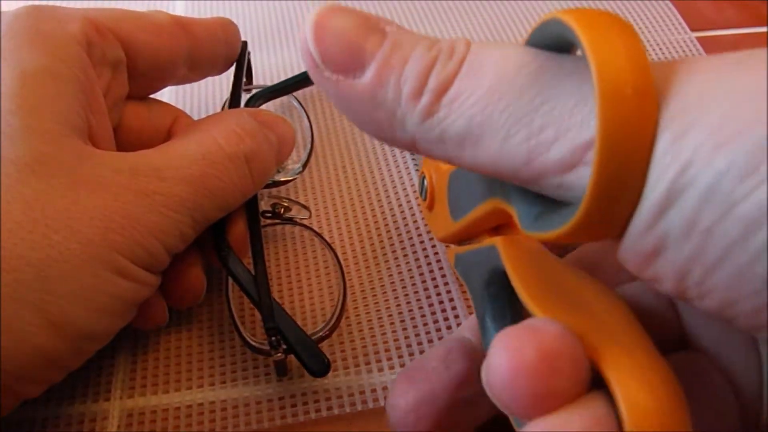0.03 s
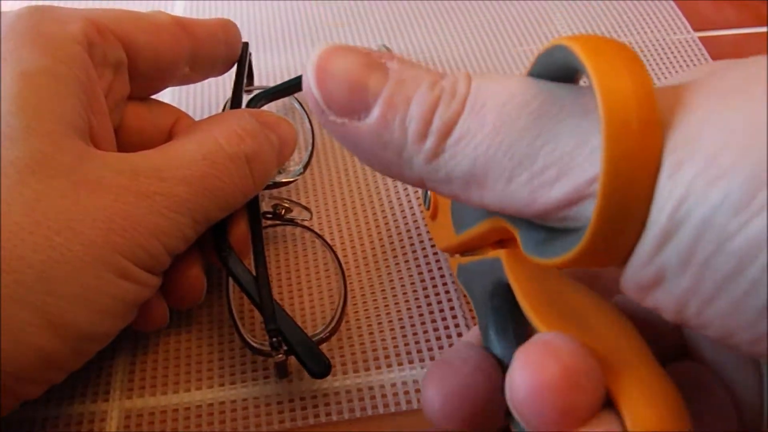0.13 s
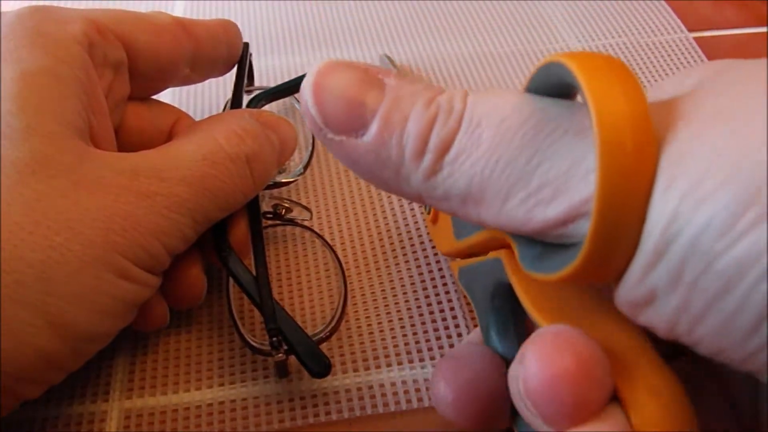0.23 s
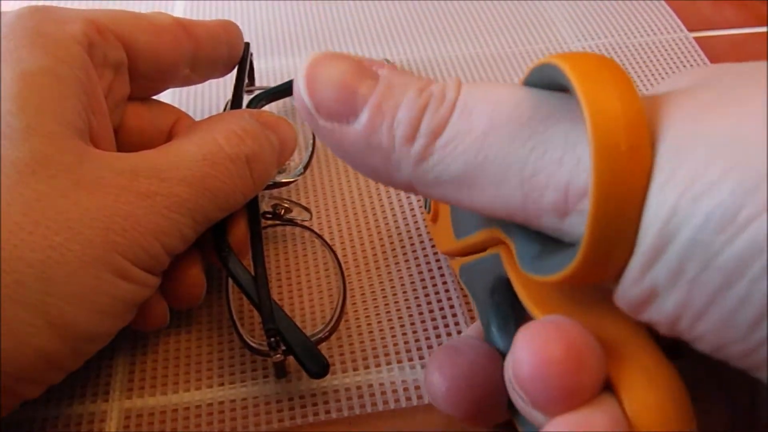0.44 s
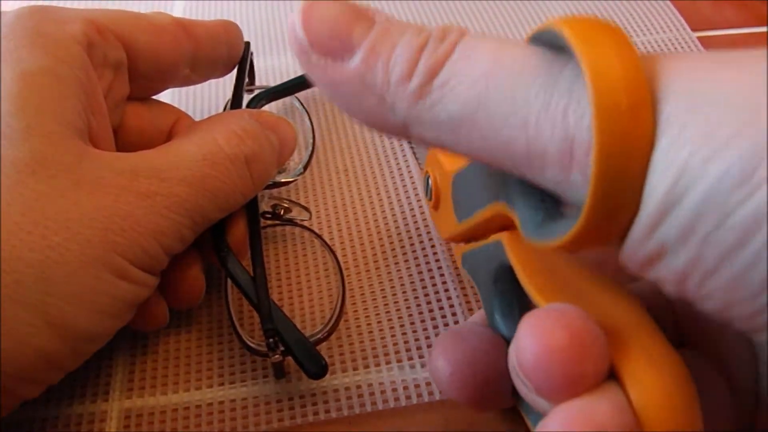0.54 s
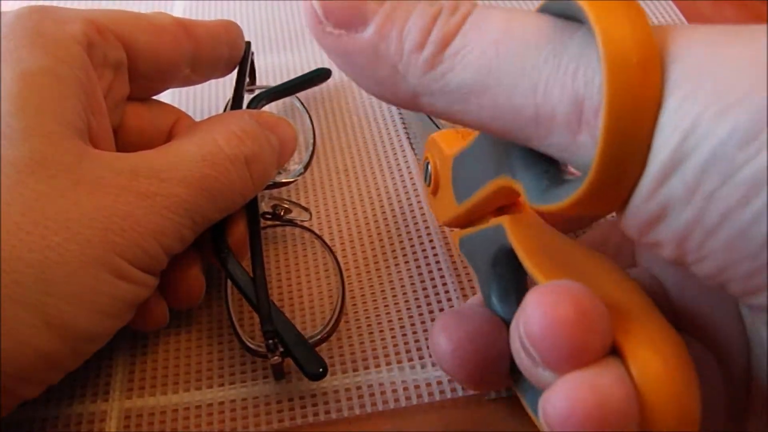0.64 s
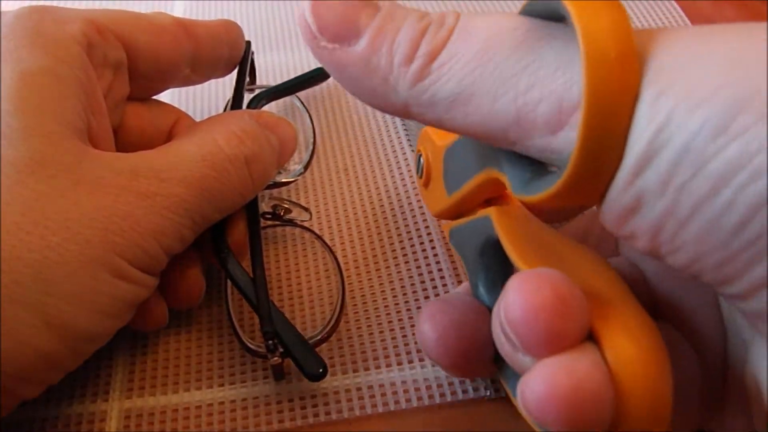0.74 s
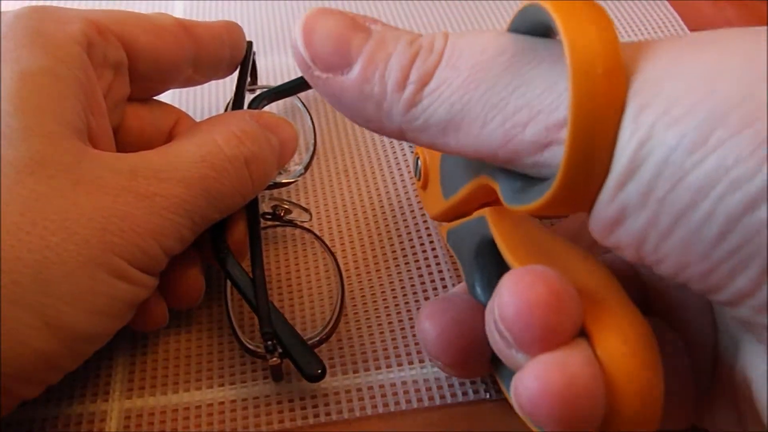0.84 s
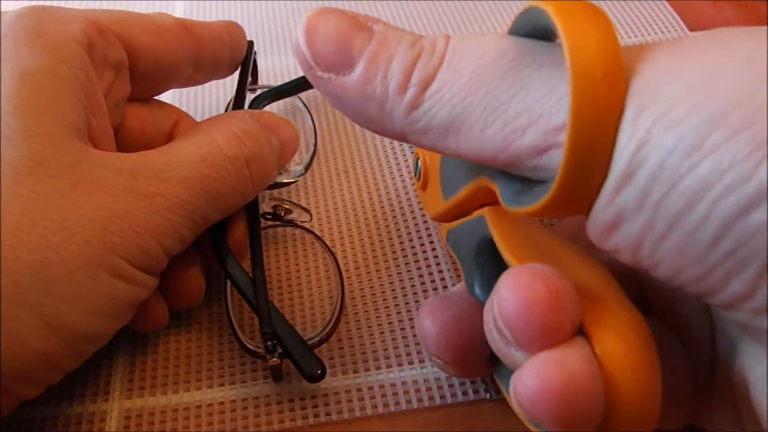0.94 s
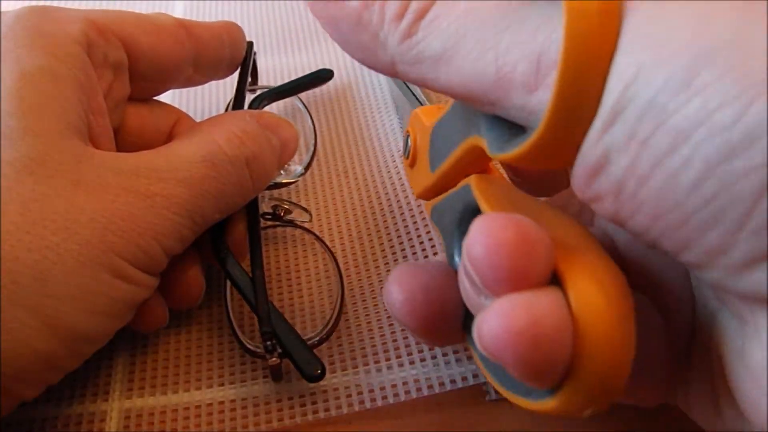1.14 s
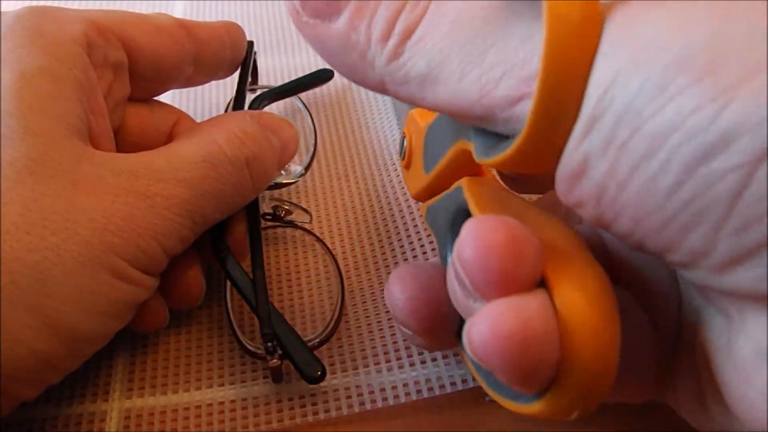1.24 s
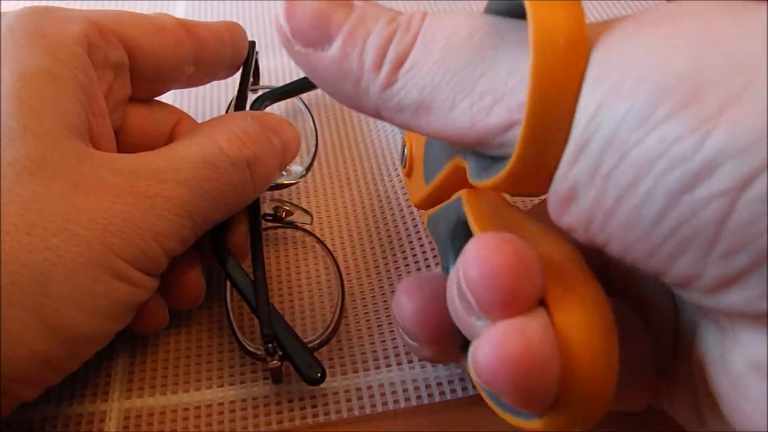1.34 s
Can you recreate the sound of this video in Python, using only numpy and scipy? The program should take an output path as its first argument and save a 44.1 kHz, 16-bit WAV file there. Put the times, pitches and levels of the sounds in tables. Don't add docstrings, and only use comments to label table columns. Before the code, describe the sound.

A crisp scissor cut through hard plastic, with gritty blade scrapes and small handle clacks indoors.

```python
import sys
import numpy as np
from scipy import signal
from scipy.fft import rfft, irfft
from scipy.io import wavfile

SR = 44100
rng = np.random.default_rng(int(sys.argv[2]) if len(sys.argv) > 2 else 0)


def wav_out(sig):
    wavfile.write(sys.argv[1], SR, np.round(np.clip(np.atleast_2d(sig).T, -1, 1) * 32767).astype(np.int16))


def attenuation_scalar(level_db):
    decades = np.asarray(level_db, float) / 20
    return 10 ** decades


N = 61739


def evened(x):
    return x / np.sqrt(np.mean(x ** 2) + 1e-20)


def read(points, hz):
    f, value = np.transpose(points)
    return np.interp(np.log(hz + 1), np.log(f + 1), value)


def add(mix, s, sound):
    part = mix[round(s * SR):][:len(sound)]
    part += sound[:len(part)]


def coloured(gain):
    spectrum = rfft(rng.standard_normal(N + 1))
    hz = np.fft.rfftfreq(N + 1, 1 / SR)
    return evened(irfft(spectrum * gain(hz), N + 1)[:N])


def swelling(points, sound):
    s, level_db = np.transpose(points)
    return attenuation_scalar(np.interp(np.arange(N) / SR, s, level_db)) * sound


def ring(modes, wobble_db, size, sign=-1):
    t = np.arange(size) / SR
    out = np.zeros(size)
    for k, ((hz, db, t60), wobble) in enumerate(zip(modes, wobble_db)):
        out += sign ** k * attenuation_scalar(db + wobble - 60 * t / t60) * np.sin(2 * np.pi * hz * t)
    return out


# f/Hz, density/dB per Hz
HISS = [(100, -1), (290, -15.5), (400, -12.5), (1200, -14.5), (3000, -15.5), (9000, -16.5), (16000, -16)]
# t/s, level/dB
RUMBLE = [(0, -52), (.15, -47.5), (.21, -47.5), (.29, -36.5), (.34, -44.5), (.42, -48), (.55, -43),
          (.7, -55), (.93, -47.5), (1.05, -50.5), (1.4, -52)]
# t/s, level/dB
RUSTLE = [(0, -51), (.1, -55.5), (.15, -67), (.2, -56.5), (.3, -51), (.4, -77), (.52, -55), (.6, -61),
          (.7, -54.5), (.78, -69.5), (.9, -58), (1, -67.5), (1.1, -57.5), (1.2, -71.5), (1.4, -64)]


def room():
    hiss_db, rumble_hz, rustle_hz = -51, 27.4, 312
    rumble = coloured(lambda hz: (hz / 12) ** 2 / (1 + (hz / 12) ** 2) / (1 + (hz / rumble_hz) ** 2))
    rustle = coloured(lambda hz: hz / rustle_hz / (1 + (hz / rustle_hz) ** 3))
    hiss = coloured(lambda hz: attenuation_scalar(read(HISS, hz)) * (hz > 90))
    return attenuation_scalar(hiss_db) * hiss + swelling(RUMBLE, rumble) + swelling(RUSTLE, rustle)


# t/s, table level/dB, grip level/dB, pivot level/dB, rattle/s
KNOCKS = [(.065, -50, -66, -43.5, .02), (0.6072, -41.5, -28.5, -24.5, 0.011), (.631, -44, -40, -42, 0.02),
          (0.812, -50, -60, -62, 0.0021), (0.825, -42.5, -71, -39, 0.0037), (.84, -61, -59, -40.5, 0.0016),
          (0.8457, -58, -61, -46, 0.0018), (0.8521, -46.5, -62, -29, 0.0011), (.859, -46, -56, -55, 0.007),
          (1.041, -58, -73, -54, 0.011), (1.124, -59, -61, -62, .005), (1.2309, -61, -52, -35, 0.008),
          (1.375, -59, -58, -40, 0.0089)]
# f/Hz, level/dB, t60/s
TABLE_MODES = [(168, -4, 0.053), (227, 5, 0.048), (329, 11, 0.078), (412, 4, 0.08), (444, 3, 0.083),
               (580, -15, 0.036)]
GRIP_MODES = [(505, 1, 0.023), (690, -13, 0.02), (850, -10, 0.046), (1035, -4, 0.06), (1268, 1, 0.019)]
PIVOT_MODES = [(1400, -2, 0.0098), (1700, 1.5, 0.023), (2260, -5.5, 0.026), (2510, 2, 0.012),
               (2830, -6, 0.012), (3270, -14, .01)]
# t/s, level/dB
TICKS = [
    (0.6075, -16),
    (0.8529, -34),
    (1.23, -44),
]
# f/Hz, level/dB, t60/s
TICK_MODES = [(4400, -9, 0.0078), (5560, -8, .004), (6840, -3, 0.0027), (8100, 0.5, 0.0037),
              (9640, -3.5, 0.0032), (10500, -2.5, 0.0031), (12600, -2, .002)]
# t/s, level/dB, f/Hz, t60/s
BUMPS = [(.6076, -34, 324, .09), (.614, -38, 324, .06), (.631, -42, 270, .07), (.641, -40, 500, .08),
         (.647, -42, 165, .12), (.652, -44, 300, .08), (.811, -40, 230, .04), (.8465, -42, 210, .03),
         (1.042, -50, 150, .1), (1.125, -47, 460, .04), (1.143, -52, 380, .06), (1.231, -38, 490, .06),
         (1.2375, -42, 380, .05), (1.3765, -40, 355, .08), (1.3955, -42, 250, .03),
         (.2085, -27, 5120, .014), (.2055, -36, 5550, .012), (.2333, -37, 5200, .01),
         (.2393, -39, 5500, .015), (.2428, -33, 5420, .02), (1.3798, -33, 10900, .012),
         (1.3819, -25, 11000, .009), (1.3818, -33, 3950, .011), (1.379, -41, 3950, .01),
         (1.378, -48, 760, .03), (.8524, -35, 2510, .014), (.8526, -42, 1700, .018),
         (.8524, -40, 3050, .008), (1.2305, -46, 2480, .012), (.6076, -32, 2450, .015),
         (.6085, -35, 1250, .06), (.6078, -41, 760, .03), (.61, -44, 2100, .05)]


def knocks():
    spread_db, rattle_db, soft_s = 1.5, -7, 0.00059
    out, t = np.zeros(N), np.arange(6000) / SR
    soft = 1 - np.exp(-t / soft_s)
    draws = rng.standard_normal((len(KNOCKS), 20 + len(t)))
    for (s, table_db, grip_db, pivot_db, rattle_s), draw in zip(KNOCKS, draws):
        wobble = spread_db * draw[:20]
        table = attenuation_scalar(table_db) * ring(TABLE_MODES, wobble, len(t), sign=0.97) * soft
        grip = attenuation_scalar(grip_db) * ring(GRIP_MODES, wobble[len(TABLE_MODES):], len(t))
        pivot = attenuation_scalar(pivot_db) * ring(PIVOT_MODES, wobble[::-1], len(t))
        rattle = attenuation_scalar(rattle_db) * draw[20:] * np.exp(-t / rattle_s) * 0.078
        drive = (t == 0) + rattle
        add(out, s, 0.5 * signal.fftconvolve(drive, table + grip + pivot))
    tick = 0.5 * ring(TICK_MODES, np.zeros(len(TICK_MODES)), size=400)
    for s, db in TICKS:
        add(out, s, attenuation_scalar(db) * tick)
    for s, db, hz, t60 in BUMPS:
        add(out, s, ring([(hz, db, t60)], [0], len(t)) * soft)
    return out


# t/s, peak level/dB, f/Hz, length/s, push level/dB
BITES = [(0.2008, -35, 2240, 0.002, -49), (0.2056, -37, 5540, 0.0014, -28.5),
         (0.2092, -28, 5200, .0017, -33), (0.2128, -36, 10800, 0.004, -44),
         (.219, -23.5, 10100, 0.0021, -46), (0.2319, -37, 9400, 0.008, -45),
         (0.235, -42, 5400, 0.0023, -60), (0.2445, -44, 5400, 0.0024, -55), (0.234, -29, 8500, 0.0016, -26),
         (0.2393, -34, 9300, 0.0012, -50), (0.244, -22.5, 11000, 0.0019, -27),
         (0.255, -34, 9000, 0.0009, -50), (0.2829, -26.5, 9600, 0.0019, -24.5),
         (0.2852, -13, 9000, 0.0005, -27), (0.5373, -35, 8000, 0.0013, -52), (0.546, -43, 7150, 0.006, -66),
         (1.3764, -29.5, 8800, 0.0022, -37), (1.3813, -25, 11000, 0.0014, -44),
         (1.3826, -25.5, 10400, 0.0012, -33.5), (1.3827, -28.5, 3700, 0.0015, -47),
         (1.396, -41, 2400, 0.00099, -48), (0.2066, -28.5, 9700, .0014, -60),
         (0.2102, -28, 9500, 0.001, -60), (0.218, -31, 11500, 0.0029, -60),
         (0.198, -46, 8500, 0.00062, -54), (0.526, -38, 10400, .0012, -60),
         (.5315, -40.5, 10000, 0.0044, -53), (1.3791, -37.5, 5830, 0.0011, -38.5),
         (0.261, -49, 11000, 0.00088, -58)]
# f/Hz, width/Hz, level/dB
BLADES = [(5400, 130, -2), (3840, 240, -7), (6400, 290, -10)]


def bites():
    width_hz_at_9k, broad_gain, top_hz = 3500, 0.093, 13700
    push_s, push_ring_hz, push_ring_db, push_ring_t60_s = 0.00078, 336, -6.5, 0.031
    out, t = np.zeros(N), (np.arange(2048) - 512) / SR
    hz = np.fft.rfftfreq(2048, 1 / SR)
    blades = sum(attenuation_scalar(db) / np.sqrt(1 + ((hz - f) / width * 2) ** 2) for f, width, db in BLADES)
    broad = broad_gain * 0.5 / (1 + (5000 / (hz + 1)) ** 4) / (1 + (hz / top_hz) ** 6)
    handle = attenuation_scalar(push_ring_db - 60 * abs(t) / push_ring_t60_s) * np.sin(2 * np.pi * push_ring_hz * t)
    push = np.exp(-(t / push_s) ** 2 * 0.5) - (t > 0) * handle
    grits = rng.standard_normal((len(BITES), 2048))
    for (s, db, pitch_hz, length_s, push_db), grit in zip(BITES, grits):
        width_hz = width_hz_at_9k * pitch_hz / 9000
        colour = 1 / (1 + ((hz - pitch_hz) / width_hz * 2) ** 2) + broad + blades
        swell = np.exp(-(2 * t / length_s) ** 2 * 0.5)
        burst = irfft(rfft(grit * swell) * colour)
        add(out, s + t[0], attenuation_scalar(db) * burst / abs(burst).max() - attenuation_scalar(push_db) * push)
    return out


# f/Hz, level/dB, t60/s
SNAP_MODES = [(320, -28, 0.011), (2970, -12.5, 0.01), (3920, -5, 0.0046), (4840, -7, 0.0042),
              (5750, -7.5, 0.0054), (6530, -7, 0.0069), (8040, 1.5, 0.0031), (9220, 1.5, 0.0032),
              (10410, -7.5, 0.0058), (11000, -6, 0.0038), (12340, -9, 0.0036), (14500, -15.5, 0.0038),
              (15500, -33, 0.002)]
# delay/s, level/dB
ECHOES = [(.0022, -22), (.0074, -26), (.0087, -25), (0.01, -22), (0.0124, -25), (.014, -27), (0.0169, -27),
          (.021, -29)]
# f/Hz, density/dB per Hz
TAIL = [(180, -26), (300, 11.5), (678, -20), (842, -12), (1250, -15), (1410, -20), (2840, -2.5),
        (6100, 1.5), (16000, -8.5)]
# f/Hz, t60/s
TAIL_T60 = [(500, 0.25), (2500, 0.3), (5000, 0.21), (9000, 0.27), (15000, 0.1)]


def snap():
    snap_s, snap_db, rise_s = 0.28545, 6, 0.000094
    thud_db, thud_s = -16, 0.00023
    echo_top_hz, echo_smear_s = 8000, 0.00045
    tail_db, tail_delay_s, tail_rise_s = -35, 0.003, 0.0028
    out = np.zeros(N)
    body = ring(SNAP_MODES, np.zeros(len(SNAP_MODES)), size=1500)
    body = body * (1 - np.exp(-np.arange(len(body)) / SR / rise_s))
    body = attenuation_scalar(snap_db) * body / abs(body).max()
    add(out, snap_s, body)
    thud = np.exp(-((np.arange(64) - 32) / SR / thud_s) ** 2 * 0.5)
    add(out, snap_s - 0.0005, -attenuation_scalar(thud_db) * thud)

    dull = signal.lfilter(*signal.butter(2, echo_top_hz, fs=SR), body)
    smear = np.exp(-np.arange(128) / SR / echo_smear_s) * 0.33
    for (delay_s, db), scatter in zip(ECHOES, rng.standard_normal((len(ECHOES), 128))):
        add(out, snap_s + delay_s, attenuation_scalar(db) * np.convolve(dull, scatter * smear))

    hz, frame_s, z = signal.stft(rng.standard_normal(SR // 2), SR, nperseg=256, noverlap=192)
    decay_db = read(TAIL, hz)[:, None] - 60 * frame_s / read(TAIL_T60, hz)[:, None]
    tail = signal.istft(z * attenuation_scalar(decay_db), SR, nperseg=256, noverlap=192)[1]
    rise = np.minimum(np.arange(len(tail)) / SR / tail_rise_s, 1)
    add(out, snap_s + tail_delay_s, attenuation_scalar(tail_db) * tail / np.std(tail[:1000]) * rise)
    return out


def scene():
    return (room() + bites() + snap() + knocks())[None]


def low_pass(x):
    return signal.sosfilt(signal.butter(12, 16430, fs=SR, output="sos"), x)


# centre t/s, length/s, depth/dB, lower edge f/Hz
DROPOUTS = [
    (.6165, .017, -45, 3000),
    (.831, .02, -14, 900),
    (1.24, .026, -18, 650),
]
KEPT_HZ = [
    (3320, 3460, 4300, 4440, 4610, 8040),
    (1650, 1740, 2500, 4300, 5100, 7400, 11200, 14000, 15600),
    (335, 470, 535, 1066, 1242, 2330, 2480, 2610, 4200, 5900, 8500, 10000, 14000, 15600),
]
KEPT_DB = (-55, -60, -59.5)


def record(dry):
    kept_s, tilt_db_per_octave, edge_hz = 0.044, -1, 15900
    hz, t, z = signal.stft(dry[0], SR, nperseg=256, noverlap=224)
    cut_db = np.zeros(z.shape)
    for s, length_s, depth_db, above_hz in DROPOUTS:
        dip = np.clip(2 - abs(t - s) / length_s * 4, 0, 1) ** 2
        cut_db += np.outer(hz > above_hz, depth_db * dip)
    thinned = signal.istft(z * attenuation_scalar(cut_db), SR, nperseg=256, noverlap=224)[1][:N]

    span = np.arange(0, kept_s, 1 / SR)
    for (s, *_), tones_hz, db in zip(DROPOUTS, KEPT_HZ, KEPT_DB):
        tones = np.zeros(len(span))
        for f in tones_hz:
            tilt = attenuation_scalar(tilt_db_per_octave * np.log2(f / 4000))
            tones += tilt * np.sin(2 * np.pi * (f * span + rng.random()))
        add(thinned, s - kept_s * 0.42, attenuation_scalar(db) * tones * np.hanning(len(span)))

    lowpass = signal.firwin(511, edge_hz, window=("kaiser", 9), fs=SR)
    limited = signal.oaconvolve(np.clip(thinned, -1.15, 1.15), lowpass, "same")
    mix = np.clip(limited[None], -1, 1)
    return low_pass(mix)


dry = scene()
out = record(dry)
wav_out(out)
```